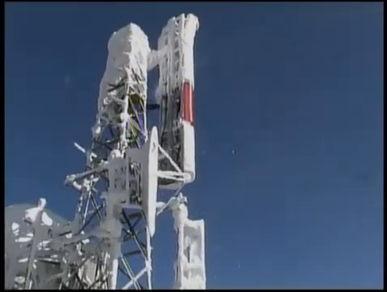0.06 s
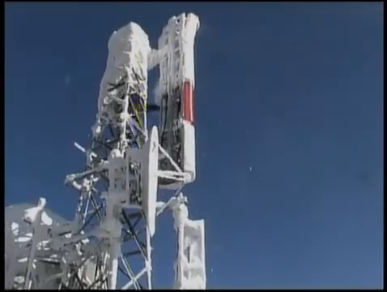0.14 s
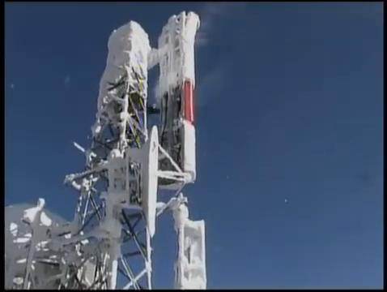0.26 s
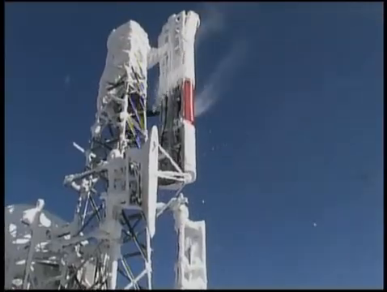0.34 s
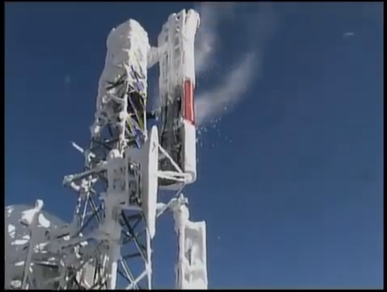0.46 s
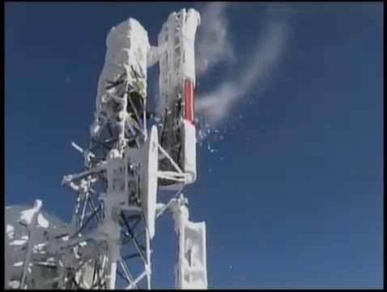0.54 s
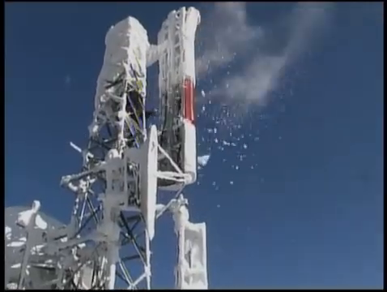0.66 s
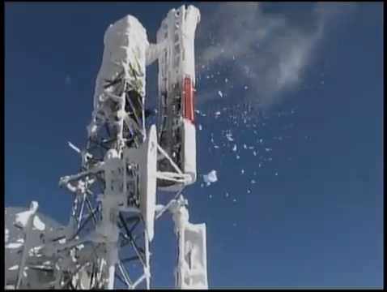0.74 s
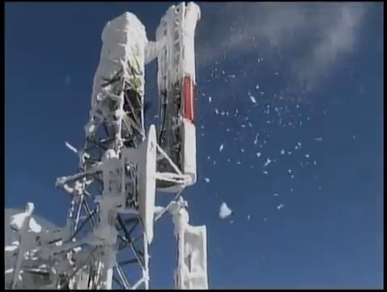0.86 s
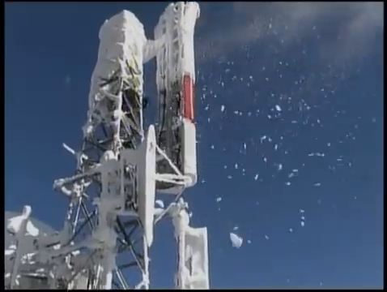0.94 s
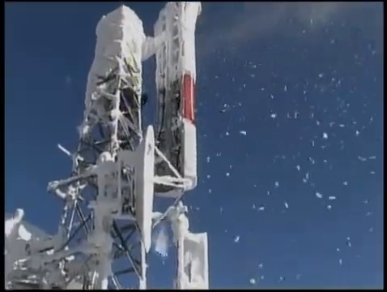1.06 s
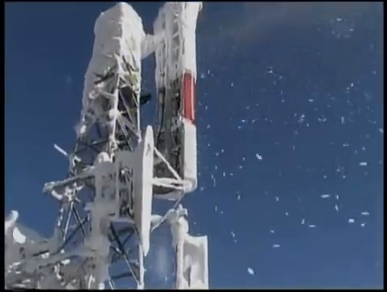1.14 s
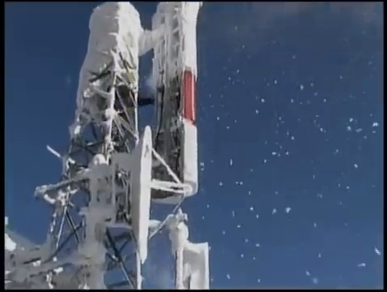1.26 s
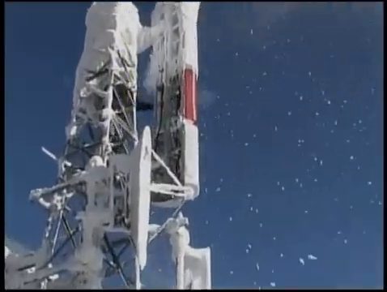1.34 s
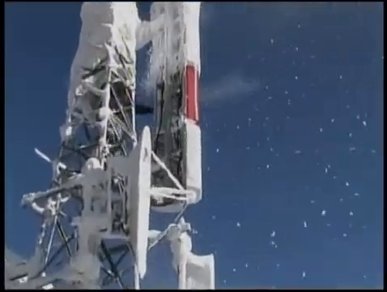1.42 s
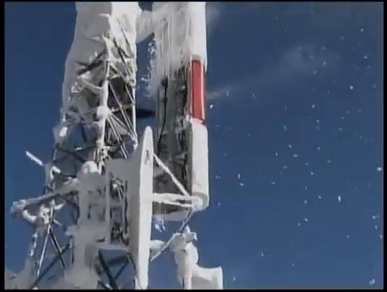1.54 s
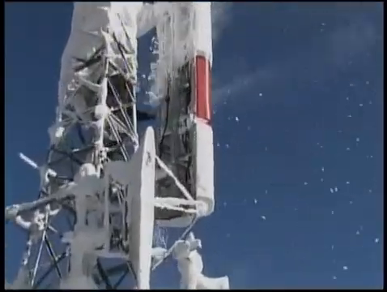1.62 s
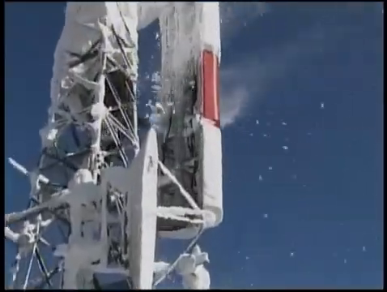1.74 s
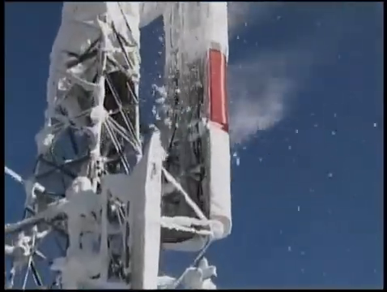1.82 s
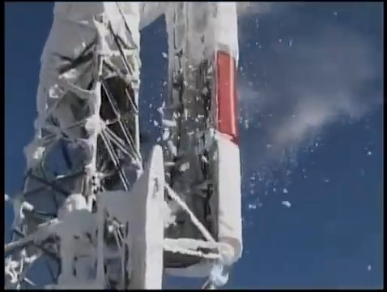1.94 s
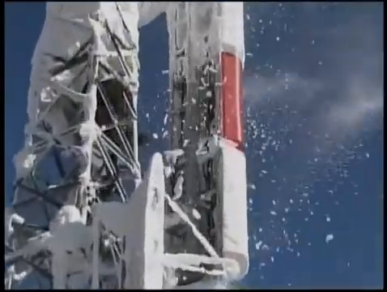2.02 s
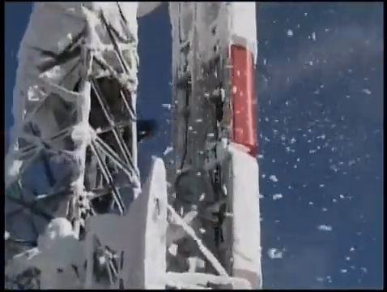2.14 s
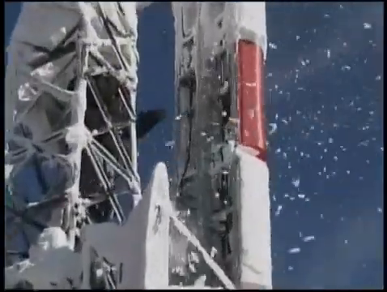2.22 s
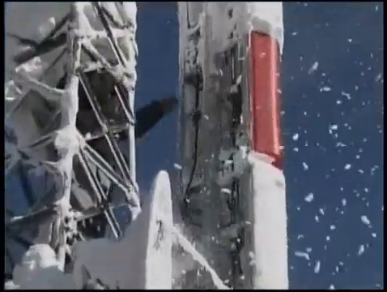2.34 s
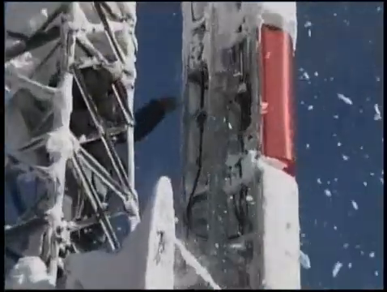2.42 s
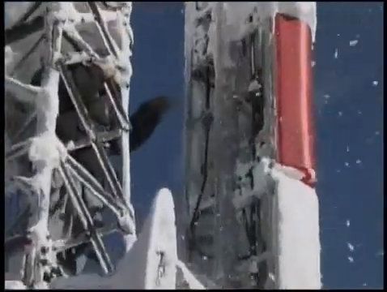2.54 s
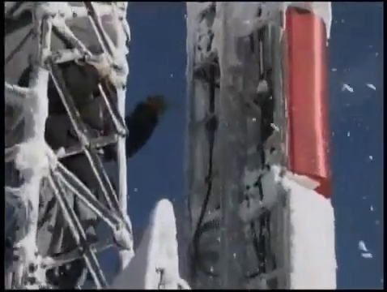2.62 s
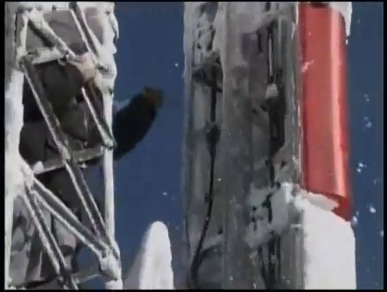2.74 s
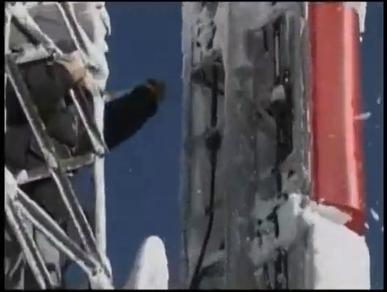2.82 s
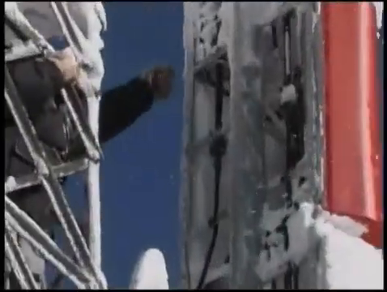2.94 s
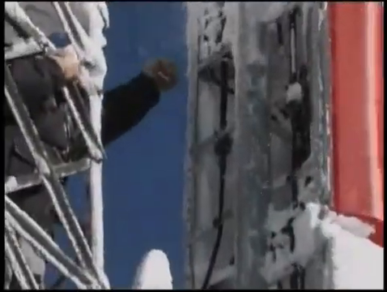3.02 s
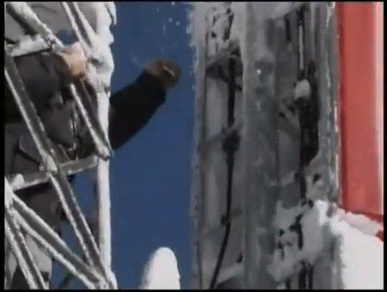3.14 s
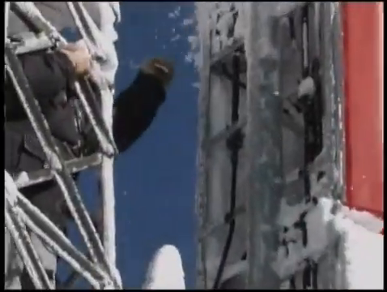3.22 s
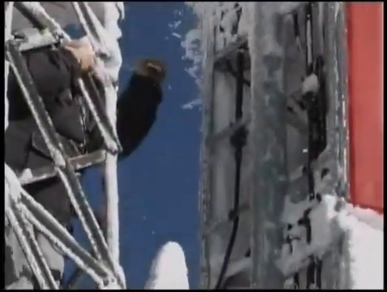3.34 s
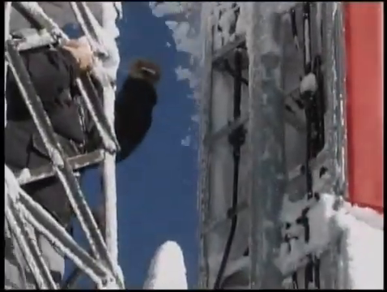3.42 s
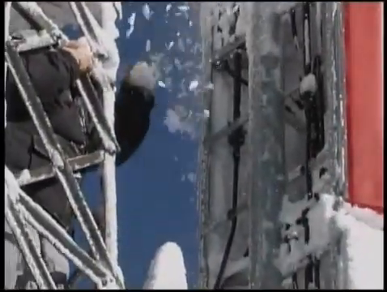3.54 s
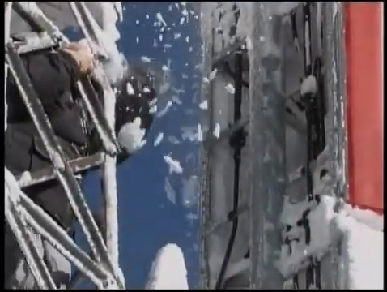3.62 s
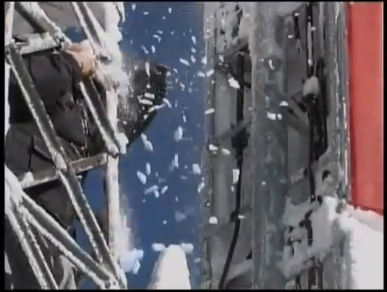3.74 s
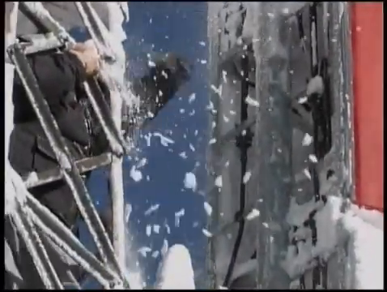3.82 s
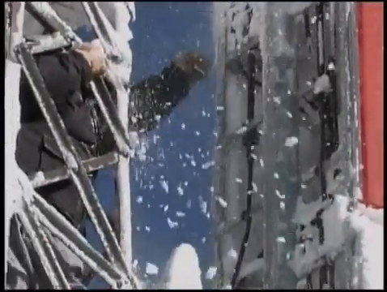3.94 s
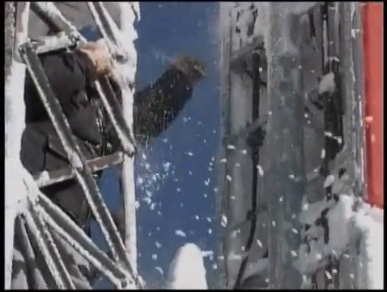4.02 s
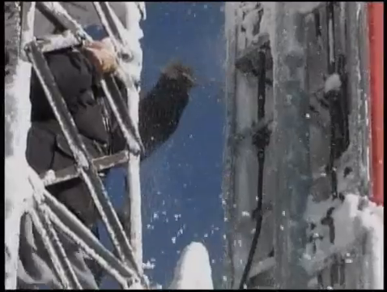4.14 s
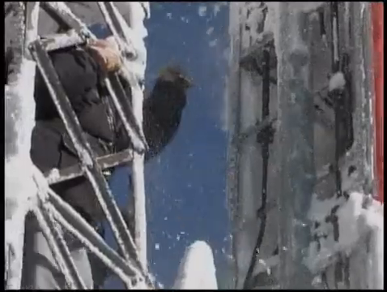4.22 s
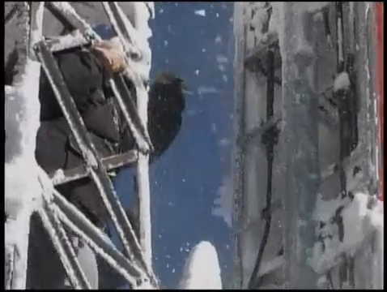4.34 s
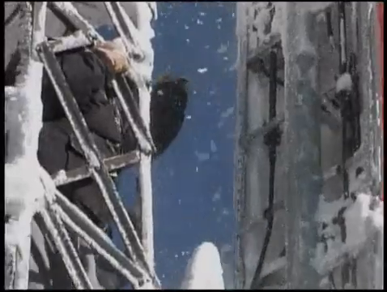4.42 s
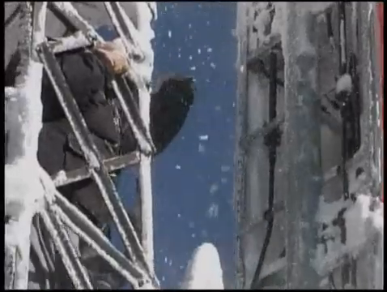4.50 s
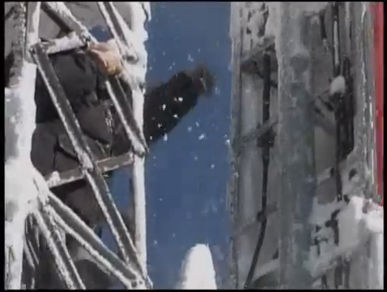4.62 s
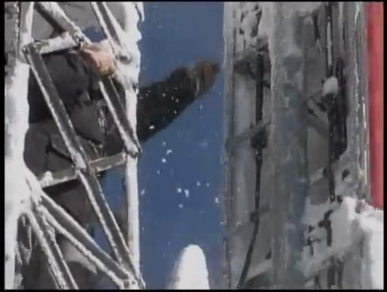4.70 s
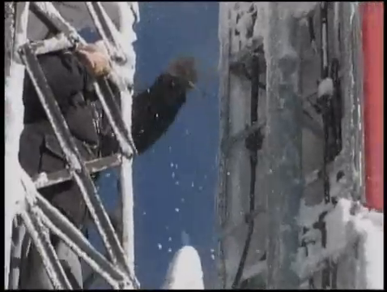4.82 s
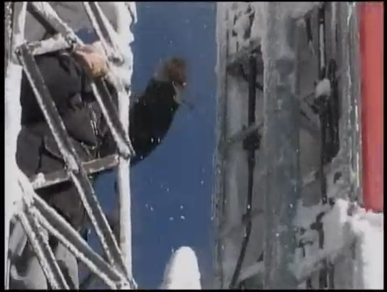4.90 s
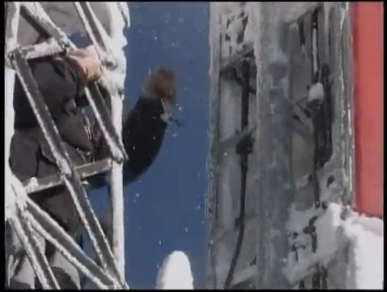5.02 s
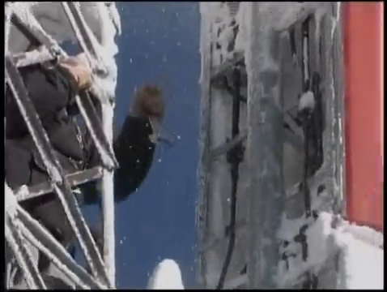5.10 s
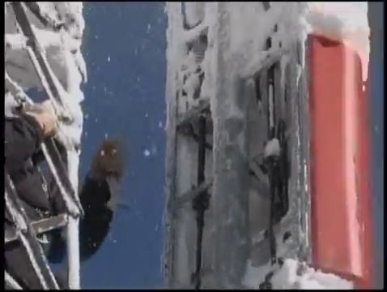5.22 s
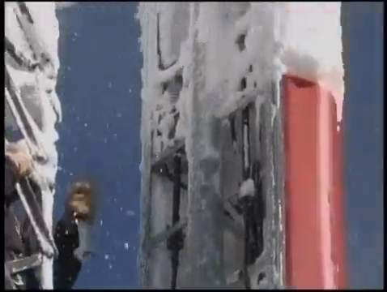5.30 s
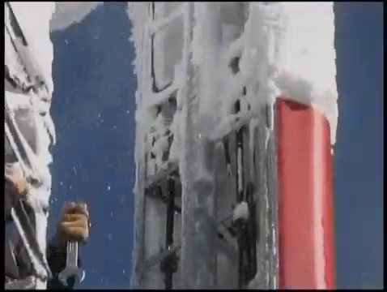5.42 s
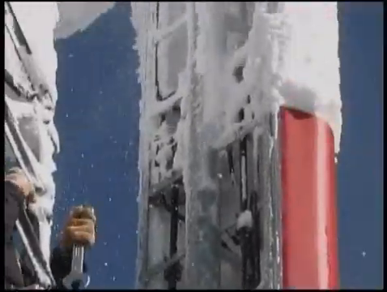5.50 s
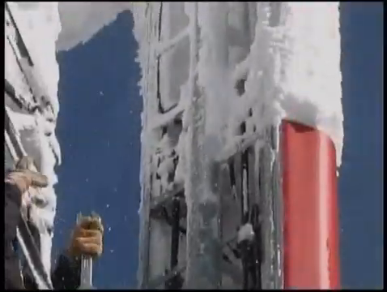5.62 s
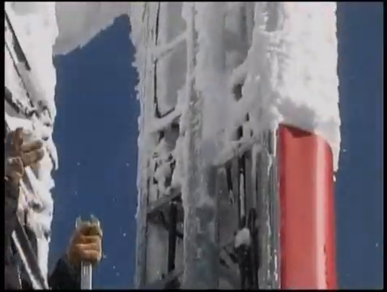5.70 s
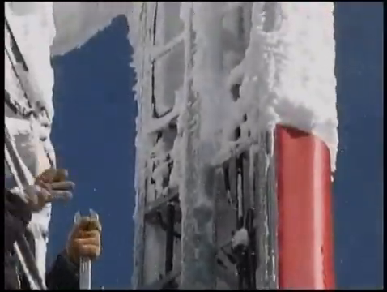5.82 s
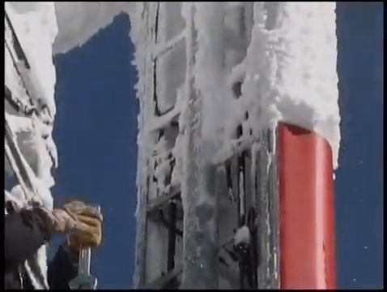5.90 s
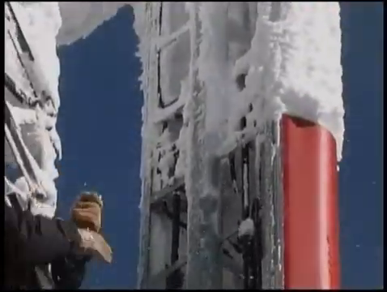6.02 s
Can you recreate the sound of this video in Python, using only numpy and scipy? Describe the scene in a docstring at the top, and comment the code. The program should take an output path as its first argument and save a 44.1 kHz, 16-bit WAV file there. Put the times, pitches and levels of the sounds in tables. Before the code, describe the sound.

An open-air stereo scene heard from the ground: low wind rumble gusts gently over faint wide hiss and a barely audible steady motor whine. From the start, fine ice crumbs patter and scattered shards tick on steel, with a small crunchy spray at 0.2 s and brighter clicks near 1.1 s. At 1.35 s comes a soft, dull, hollow knock. Crumbs thin out, then spray again around 2.2 s. At 2.5 s a hard bright crack clangs the metal panel, and sharp shards click thickly from 2.7 to 3.1 s with little thuds. Another loud snap at 3.14 s rebounds at once with a low boom. Ticks thin out until a strong crack at 4.07 s, again with a quick rebound, and a last one at 4.86 s with a short hollow ring. A low soft thump follows at 5.0 s, then sparse ticks and a faint crunch in the wind until 6 s.

```python
"""Rime ice knocked off a tower panel

A wrench knocks rime ice off a hollow antenna panel high on a steel tower, heard from the ground.
Each blow is a snap of ice, crackling noise with bands that decay at their own speeds, and damped modes
of panel and wrench. Shards and lumps are windowed pulses, shards ending in a puff of noise;
powder sprays and crumb showers are blotchy noise studded with small ticks.
Shaped noise gives the wind's rumble and a wide hiss; steady sines give a motor's faint whine."""
import sys
import numpy as np
from scipy import signal
from scipy.fft import rfft, irfft, next_fast_len
from scipy.io import wavfile
from scipy.ndimage import uniform_filter1d

SR = 44100
rng = np.random.default_rng(int(sys.argv[2]) if len(sys.argv) > 2 else 0)


def transcribe(signal):
    """Save signal, clipped to [-1, 1], as a 16-bit WAV file at the path in sys.argv[1]."""
    frames = np.atleast_2d(signal).T
    limited = np.clip(frames, -1, 1)
    pcm = np.round(limited * 32767).astype(np.int16)
    wavfile.write(sys.argv[1], SR, pcm)


N = 267290  # samples

# Source levels of the tower sounds are those before TOWER_TONE; spectral levels are relative.
# Wind strength: start_s, level_db
GUST_LEVEL = [(0.0, -44.5), (0.29, -49.5), (0.57, -47), (0.93, -50), (1.87, -50), (2.6, -49), (3.27, -46),
              (3.75, -50.5), (4.27, -48), (4.67, -51.5), (4.94, -48.5), (6.06, -50)]
# Wind spectrum: frequency_hz, density_db
WIND_SPECTRUM = [(12, -51.5), (20, -18), (65, 2), (112, -2), (178, -2.5), (247, -9.5), (404, -19.5),
                 (441, -24), (700, -26.5), (910, -56), (1540, -120)]
# Far hiss spectrum: frequency_hz, density_db
HISS_SPECTRUM = [(180, -42), (300, -4), (817, -4), (903, -4), (965, -3.5), (3160, -10.5), (3550, -11),
                 (7030, -18), (13300, -25.5), (14900, -28.5), (16200, -44)]
HISS_DB = -58
# Motor lines: multiple of MOTOR_HZ, level_db
MOTOR_LINES = [(3, -71), (5, -75), (6, -70), (7, -75), (10, -73), (14, -75.5), (16, -80), (18, -77.5),
               (22, -101), (24, -70), (26, -78)]
MOTOR_HZ = 150

# Distant falling crumbs: start_s, level_db
SHOWER_LEVEL = [(0.0, -54), (0.89, -60), (1.28, -54.5), (1.64, -58), (2.58, -55.5), (2.97, -49.5),
                (3.46, -56.5), (3.76, -54.5), (4.0, -56), (6.06, -58.5)]
# Crumb spectrum: frequency_hz, density_db
SHOWER_SPECTRUM = [(350, -58), (600, -2), (1080, -4.5), (1290, -0.5), (2120, -4), (3250, -4), (6550, -3.5),
                   (13800, -12.5), (16000, -22.5)]
SHOWER_TICKS_PER_S = 150

# Powder and crumbs hitting the steel: start_s, length_s, level_db, centre_hz
SPRAY_EVENTS = [(0.003, 0.2, -57, 5170), (0.194, 0.059, -48.5, 4900), (.43, 0.062, -56, 5130),
                (0.512, 0.073, -54.5, 4340), (1.168, 0.067, -57, 5770), (1.393, 0.09, -51.5, 4400),
                (1.87, 0.048, -55.5, 3570), (2.227, 0.075, -44, 3180), (2.86, 0.035, -45, 3050),
                (2.977, 0.053, -52, 3320), (3.436, 0.055, -53.5, 4500), (3.707, 0.028, -56, 1320),
                (3.757, 0.042, -52.5, 6160), (3.783, 0.044, -56.5, 2000), (4.333, 0.048, -55.5, 6500),
                (4.579, 0.021, -52, 5040), (5.391, 0.14, -57.5, 5600)]
SPRAY_SPREAD_HZ = 4800

# Shards striking steel; the one at 3.1387 s is a blow's lower second snap:
# time_s, tick_db, centre_hz, spread_octaves, crumble_db (relative to the tick)
SHARD_EVENTS = [(0.118, -25.5, 4230, 0.77, -12), (0.4451, -37, 4950, .75, -11),
                (0.776, -35.5, 4590, 1.7, -15), (1.064, -27.5, 6760, 0.55, -21),
                (1.1543, -25, 5500, 1.26, -14.5), (1.217, -31.5, 5610, .51, -19),
                (1.8766, -35.5, 4670, 0.92, -14), (2.0399, -40, 6790, .62, -16),
                (2.233, -31, 5300, 1.05, -10.5), (2.276, -24, 4290, 1.5, -20),
                (2.619, -35.5, 7360, .87, -13.5), (2.7225, -32, 2570, 2, -11.5),
                (2.7634, -15.5, 5940, .86, -20), (2.802, -38.5, 4730, 1.2, -6),
                (2.815, -34, 5200, 1.7, -7.5), (2.8778, -15, 3730, .9, -24.5),
                (2.9542, -27, 4000, .9, -19.5), (2.99, -31.5, 3340, 1.2, -11),
                (3.0129, -20, 4370, 0.58, -24), (3.0932, -30, 10590, .33, -18),
                (3.1164, -28.5, 3280, .97, -8), (3.1387, -11.5, 2570, 1.16, -31),
                (3.243, -21.5, 7600, 0.86, -25), (3.427, -38, 5460, 0.86, -12),
                (3.4924, -36, 5050, 1.02, -13.5), (3.6672, -30, 3570, .61, -18),
                (3.684, -32, 5380, 0.91, -18), (4.295, -34.5, 6900, 0.47, -10.5),
                (4.4127, -36.5, 8640, 0.65, -16.5), (4.7133, -38, 3750, .72, -16),
                (5.4495, -38.5, 6800, 0.19, -15), (5.8057, -36, 4660, 0.45, -22)]
SHARD_PAN_DB, CRUMBLE_T60_S = 3.5, 0.057  # standard deviation of left-right level; decay of the puff
# Small shards at random moments
CHIP_COUNT, CHIP_DB, CHIP_HZ, CHIP_OCTAVES, CHIP_CRUMBLE_DB = 24, -45.5, 5900, 0.79, -14

# Lumps of ice landing: time_s, level_db, pitch_hz, length_cycles
THUD_EVENTS = [(.782, -43.5, 800, 2), (2.133, -47, 710, 2.9), (2.723, -37.5, 330, 1.15),
               (2.885, -31, 1180, 1.7), (3.021, -38, 201, 0.61), (3.116, -40, 1990, 5.),
               (5.025, -35, 93, 2.5)]

# Blows and their rebounds: time_s, snap_db, snap_hz, boom_lag_s, pitch_factor and ring_time_factor
# (both set by the ice still on the panel), then drive_db of the deep, low, high, knock, clack and
# clang modes and of the wrench
BLOW_EVENTS = [(1.3549, -29, 800, 0.0012, 1.075, 0.69, -17, -21.5, -27, -32.5, -57, -40, -55),
               (2.5022, -5.5, 5940, 0.0032, 1.04, 0.93, -29.5, -32, -20.5, -27.5, -35, -14.5, -41),
               (3.1384, -7.5, 10700, 0.00063, 1, 0.29, -25, -21, -24, -25.5, -24, -31, -49),
               (3.148, -36, 4000, 0.00026, 1.005, 0.75, -16, -18, -24, -32, -56, -52, -40),
               (4.0682, -4.5, 6630, 0.001, .995, 0.91, -21.5, -20.5, -33, -34, -25.5, -19.5, -62),
               (4.076, -28, 3030, 0.00076, 0.97, 1.14, -55, -15.5, -22.5, -31.5, -41, -38, -60),
               (4.8559, -8, 6700, 0.0026, 1.015, 1.29, -49, -30, -36, -27.5, -31.5, -36, -40)]
# Panel modes by group; where a blow lands decides each group's drive. Nominal values:
# pitch_hz, level_db, t60_s
PANEL_MODES = {"deep": [(73.4, -2.5, 0.11), (120.5, 6.5, 0.12)], "low": [(140.2, -2, 0.31)],
               "high": [(184.2, -0.5, 0.32), (193.2, -2, 0.17)], "knock": [(216.2, 3, 0.2), (251, -1, 0.11),
               (283, -5.5, 0.16), (330, -2.5, 0.13), (474, -13.5, 0.15)], "clack": [(777, 0, 0.063),
               (1025, 0, 0.054), (1152, 1.5, 0.048), (1306, -2, 0.069)], "clang": [(2230, 1.5, 0.016),
               (2980, -17, 0.048), (2914, -7, 0.059), (3280, -18, .04)]}
# Modes of the steel tool: pitch_hz, level_db, t60_s
WRENCH_MODES = [(4300, -1, 0.11), (4727, -2, 0.11), (5060, 0.5, 0.2), (5190, -10, .12)]
SWELL_CYCLES = 0.66  # time constant of a mode's onset
SNAP_CYCLES = 1.32
# Crackle spectrum before its tilt: frequency_hz, density_db
CRACKLE_SPECTRUM = [(240, -39), (400, 12), (580, -7), (800, -7), (1330, -5.5), (1850, -10.5), (2800, -5.5),
                    (3400, -7.5), (5200, -8.5), (9000, -11), (13100, -18), (16000, -41)]
# Crackle decay: frequency_hz, t60_s
CRACKLE_DECAY = [(500, 0.14), (2000, 0.093), (5000, 0.076), (12000, 0.024)]
# Decay of loosened crumbs trickling: frequency_hz, t60_s
TRICKLE_DECAY = [(500, 0.37), (2000, 0.33), (5000, 0.28), (12000, 0.16)]
CRACKLE_TILT_DB = 0.7  # per octave
CRACK_COLOUR_DB = 3.5  # every crack has its own strong bands and gaps
CRACKLE_DB, CRACKLE_PER_SNAP = -21.5, 0.53  # crackle after a full-scale snap; dB gained per dB of snap

# Tower sounds: lowest bass cut, treble gently softened: frequency_hz, gain_db
TOWER_TONE = [(20, -8), (55, 2.5), (8500, -2), (11000, -4), (16000, -3.5)]
# Left-right likeness of the background noise: frequency_hz, correlation
DIFFUSE_LIKENESS = [(60, 0.98), (120, 0.97), (240, 0.97), (480, 0.32), (950, -0.89), (1890, -0.33),
                    (3770, 0.027), (7520, -2), (15000, -1.1)]
# Left-right likeness of noise from the tower: frequency_hz, correlation
DIRECT_LIKENESS = [(60, 0.89), (400, 0.3), (1000, 0.98), (2400, 1), (6000, 0.92), (15000, 0.97)]
# Level between the microphone ports: frequency_hz, left_minus_right_db
PORT_LEVEL = [(60, -1.5), (130, -0.5), (290, -5), (640, -1), (1410, 0.0), (3100, 1.0), (6820, 0.5),
              (15000, 0)]
# Phase between the microphone ports: frequency_hz, left_lead_rad
PORT_PHASE = [(20, -0.14), (340, -0.46), (600, 1), (2400, 0.31), (16000, 0.04)]
EDGE_HZ = 15800  # upper band limit


def amp(db):
    """Decibel law: level to amplitude."""
    return 10 ** (np.asarray(db) / 20)


def evened(x):
    """Normalisation to unit rms."""
    return x / np.sqrt(np.mean(x ** 2) + 1e-20)


def read(points, hz):
    """Interpolation of a curve on a logarithmic frequency axis."""
    f, value = np.transpose(points)
    return np.interp(np.log(hz + 1), np.log(f + 1), value)


def along(curve):
    """Linear interpolation of a level curve over time."""
    return np.interp(np.arange(N) / SR, *np.transpose(curve))


def add(mix, s, sound):
    """Superposition of a sound on the mix from s seconds, cut at the end."""
    part = mix[:, round(s * SR):][:, :sound.shape[-1]]
    part += sound[..., :part.shape[1]]


def noise(samples, field_db, likeness, size):
    """Stereo noise of rms 1 by inverse transform of random spectra; field_db(hz, t) shapes it."""
    hz = np.fft.rfftfreq(size, 1 / SR)[:, None]
    t = np.arange(4 * samples // size + 5) * size / 4 / SR
    a, b, c, d = rng.standard_normal((len(t), len(hz), 4)).T
    left, independent = a + 1j * b, c + 1j * d
    same = np.clip(read(likeness, hz), -1, 1)
    right = same * left + np.sqrt(1 - same ** 2) * independent
    spectra = np.array([left, right]) * amp(field_db(hz, t))
    sound = signal.istft(spectra, nperseg=size, noverlap=3 * size // 4)[1]
    return evened(sound[:, :samples])


def patches(hz, t, wide, long):
    """Smoothed random field: blotches over frequency and time, rms 1."""
    field = rng.standard_normal((len(t), len(hz))).T
    return evened(uniform_filter1d(uniform_filter1d(field, wide, 0), long, 1))


def bell(centre_hz, octaves):
    """Band-limited excitation: a broad hump of spectrum, in dB."""
    return lambda hz, t: -6 * (np.log2((hz + 50) / centre_hz) / max(octaves, .2)) ** 2 + 0 * t


def grainy(samples, depth_db, size):
    """Amplitude modulation by quick random level changes: ice breaks in bits."""
    return amp(depth_db * evened(uniform_filter1d(rng.standard_normal(samples), size=size)))


def tick(hz, cycles):
    """Impact pulse: about one to a few cycles in a bell window, its strongest swing usually a pull."""
    u = np.arange(-3, 3, hz / SR / cycles * 2)
    return -np.exp(-u ** 2) * np.cos(np.pi * cycles * u + .6)


def strike(mix, s, gain, hz, cycles):
    """Impact superposed on the mix, its pulse centred on s seconds."""
    pulse = tick(hz, max(cycles, .3))
    add(mix, s - len(pulse) / 2 / SR, gain * pulse)


def wind_rumble():
    """Turbulent noise: a lumpy low spectrum rising and falling with the gusts."""
    field_db = lambda hz, t: read(WIND_SPECTRUM, hz) + 1.5 * patches(hz, t, 3, 4)
    return amp(along(GUST_LEVEL)) * noise(N, field_db, DIFFUSE_LIKENESS, size=2048)


def far_hiss():
    """Diffuse-field noise: a wide, smooth spectrum with faint blotches."""
    field_db = lambda hz, t: read(HISS_SPECTRUM, hz) + 0.4 * patches(hz, t, 14, 12)
    return amp(HISS_DB) * noise(N, field_db, DIFFUSE_LIKENESS, size=1024)


def motor_whine():
    """Harmonic line spectrum: steady sines at multiples of one rate."""
    turns = MOTOR_HZ * np.arange(N) / SR
    return sum(amp(db) * np.sin(2 * np.pi * (k * turns + rng.random())) for k, db in MOTOR_LINES)


def shower():
    """Many small impacts merging: dense crumbs as flickering noise, sparse tiny ticks on top."""
    def field_db(hz, t):
        overall = 1.1 * patches(hz[:1], t, 1, 5)
        by_band = 2.05 * patches(hz, t, 12, 8)
        return read(SHOWER_SPECTRUM, hz) + overall + by_band

    crumbs = noise(N, field_db, DIRECT_LIKENESS, size=256)
    hits = rng.random(N) < SHOWER_TICKS_PER_S / SR
    size = amp(1.6 * np.minimum(rng.exponential(1, N), 4)) * hits
    kind = rng.integers(0, 8, N)
    ticks = sum(np.convolve(size * (kind == k), tick(hz, cycles=1.6), "same")
                for k, hz in enumerate(np.geomspace(3000, 10000, 8)))
    return amp(along(SHOWER_LEVEL)) * (crumbs + 0.13 * evened(ticks))


def sprays():
    """Clustered impacts: crunchy blotchy hiss that starts fast, holds and thins, studded with ticks."""
    out = np.zeros((2, N))
    for s, length, db, centre_hz in SPRAY_EVENTS:
        u = np.arange(0, 1.8, 1 / SR / length)  # time in spray lengths
        shape = np.minimum(u / 0.19, 1) / np.sqrt(1 + u ** 8)
        hump = bell(centre_hz, min(SPRAY_SPREAD_HZ / centre_hz, 1.4))
        blotchy = lambda hz, t: hump(hz, t) + 2.9 * patches(hz, t, 7, 9)
        powder = grainy(len(u), 0.84, size=60) * noise(len(u), blotchy, DIRECT_LIKENESS, size=128)
        add(out, s, amp(db) * shape * powder)
        for place, pitch, size in rng.random((16, 3)):
            tick_hz = centre_hz * 2 ** (.9 * pitch - .3)
            strike(out, s + place * length, amp(db + 9.8 * size), tick_hz, 1.3)
    return out


def shards():
    """Impact then fragmentation: a tick, and a short puff of crumbling around the same pitch."""
    out, t = np.zeros((2, N)), np.arange(SR // 10) / SR
    chips = [(when * N / SR, CHIP_DB, CHIP_HZ * 2 ** (.7 * (pitch - .5)), CHIP_OCTAVES, CHIP_CRUMBLE_DB)
             for when, pitch in rng.random((CHIP_COUNT, 2))]
    for s, db, centre_hz, octaves, crumble_db in SHARD_EVENTS + chips:
        pan_db = SHARD_PAN_DB * rng.standard_normal()
        side = amp(db + np.array([[pan_db], [-pan_db]]) / 2)
        puff = noise(len(t), bell(centre_hz, octaves), DIRECT_LIKENESS, size=128)
        puff = puff * grainy(len(t), 4.55, size=50)
        decay = amp(crumble_db - 60 * t / CRUMBLE_T60_S)
        strike(out, max(s, .01), side, centre_hz, 0.89 / max(octaves, .2))  # wider band, shorter tick
        add(out, s, side * decay * puff * np.minimum(t / 0.00047, 1))
    return out


def thuds():
    """Impulsive loading: a short dull push as each lump lands."""
    out = np.zeros((2, N))
    for s, db, hz, cycles in THUD_EVENTS:
        strike(out, s, amp(db), hz, cycles)
    return out


def ring(modes, t, length=1, pitch=1):
    """Modal superposition: decaying sines that swell over their first cycles."""
    total = 0
    for hz, db, t60 in modes:
        swell = 1 - np.exp(-t * hz / SWELL_CYCLES)
        total = total + amp(db - 60 * t / (t60 * length)) * np.sin(2 * np.pi * hz * pitch * t) * swell
    return total


def fading(samples, t60s, size):
    """Frequency-dependent decay: noise bands die at their own speeds; rms 1 over the first 10 ms."""
    def field_db(hz, t):
        bands = np.interp(hz, np.linspace(0, SR / 2, 60), rng.standard_normal(60))
        tilt = CRACKLE_TILT_DB * np.log2((hz + 50) / 3000)
        return read(CRACKLE_SPECTRUM, hz) + tilt - 60 * t / read(t60s, hz) + CRACK_COLOUR_DB * bands

    x = noise(samples, field_db, DIRECT_LIKENESS, size)
    return x / np.std(x[:, :SR // 100])


def blows():
    """Brittle fracture and modal ringing: snap, grainy crackle, slower trickle, then panel and tool."""
    out, t = np.zeros((2, N)), np.arange(SR // 2) / SR
    for s, snap_db, snap_hz, lag, pitch, length, *boom_db, clack_db, clang_db, wrench_db in BLOW_EVENTS:
        strike(out, s, amp(snap_db), snap_hz, SNAP_CYCLES)

        crackle_db = CRACKLE_DB + CRACKLE_PER_SNAP * snap_db
        burst = fading(len(t), CRACKLE_DECAY, size=128) * grainy(len(t), 0.56, size=40)
        trickle = fading(len(t), TRICKLE_DECAY, size=256) * grainy(len(t), 2.4, size=200)
        onset = np.minimum(t / 0.0002, 1)
        add(out, s - .0006, amp(crackle_db) * (burst + amp(-14) * trickle) * onset)

        # boom_db pairs with the first four groups: deep, low, high, knock
        boom = [amp(db) * ring(modes, t, length, pitch) for db, modes in zip(boom_db, PANEL_MODES.values())]
        add(out, s + lag, sum(boom))  # the panel's boom starts a moment after the snap
        add(out, s, amp(clack_db) * ring(PANEL_MODES["clack"], t, length))
        add(out, s, amp(clang_db) * ring(PANEL_MODES["clang"], t, length))
        add(out, s, amp(wrench_db) * ring(WRENCH_MODES, t))
    return out


def tone_shaped(tower):
    """Linear filtering: the tower sounds lose their lowest bass and their treble is gently softened."""
    size = next_fast_len(N + 4096)
    gain = amp(read(TOWER_TONE, np.fft.rfftfreq(size, 1 / SR)))
    return irfft(rfft(tower, size) * gain, size)[:, :N]


def scene():
    """Superposition of the background and the tone-shaped tower sounds."""
    background = wind_rumble() + far_hiss() + motor_whine()
    tower = shower() + sprays() + shards() + thuds() + blows()
    return background + tone_shaped(tower)


def record(dry):
    """Interchannel difference: two ports differ in level and phase by frequency; then the band limit."""
    size = next_fast_len(N + 4096)
    hz = np.fft.rfftfreq(size, 1 / SR)
    half = amp(read(PORT_LEVEL, hz) / 2) * np.exp(.5j * read(PORT_PHASE, hz))  # half the difference each
    ported = irfft(rfft(dry, size) * np.array([half, 1 / half]), size)[:, :N]
    lowpass = signal.firwin(255, EDGE_HZ, window=("kaiser", 9), fs=SR)
    return signal.oaconvolve(ported, lowpass[None], "same")


dry = scene()
out = record(dry)
transcribe(out)
```